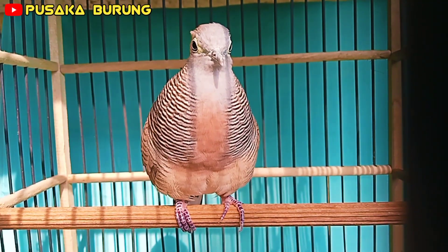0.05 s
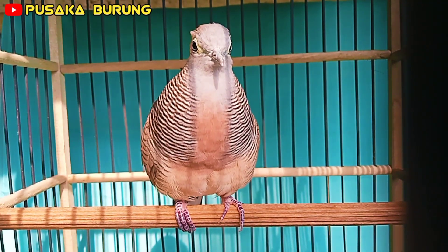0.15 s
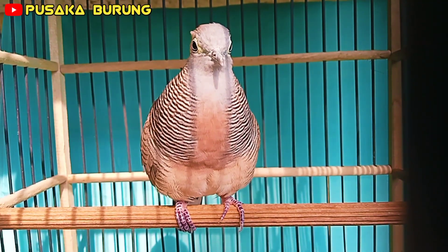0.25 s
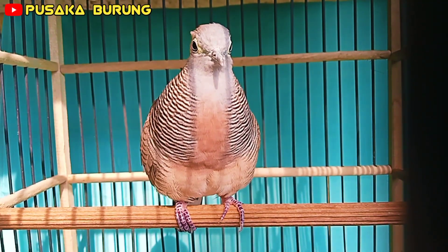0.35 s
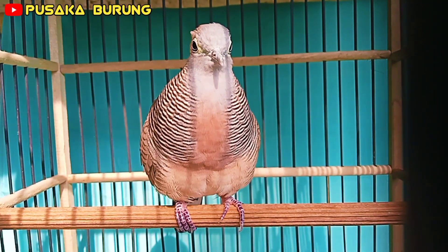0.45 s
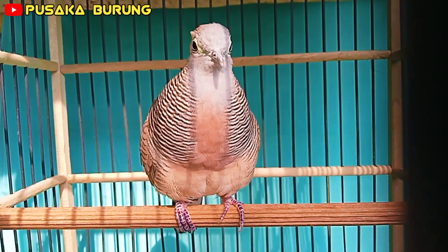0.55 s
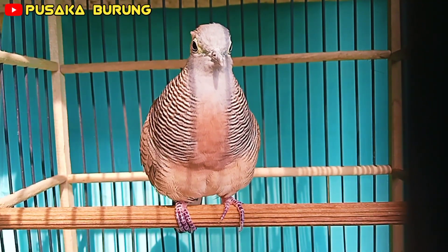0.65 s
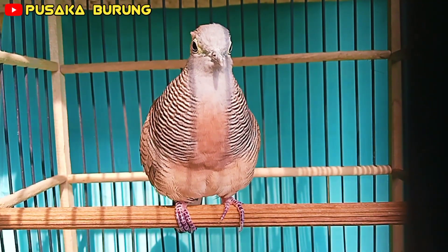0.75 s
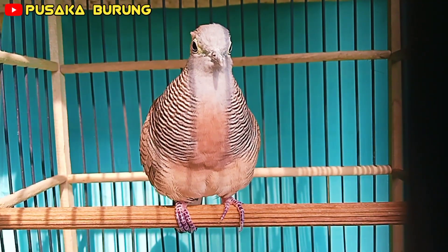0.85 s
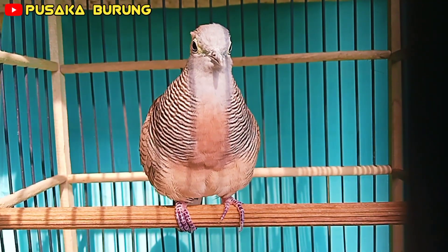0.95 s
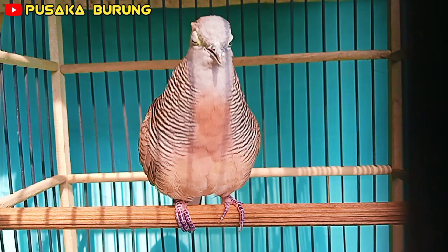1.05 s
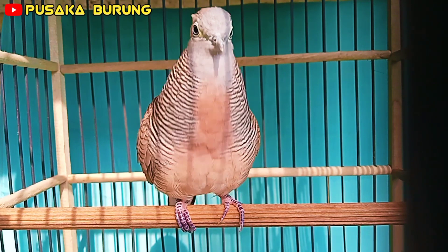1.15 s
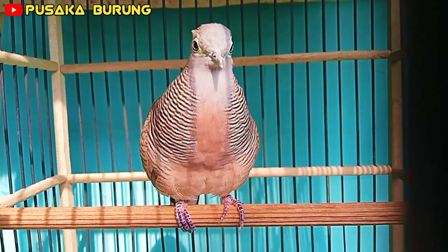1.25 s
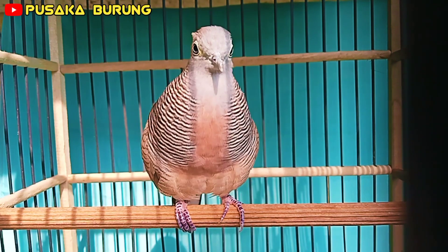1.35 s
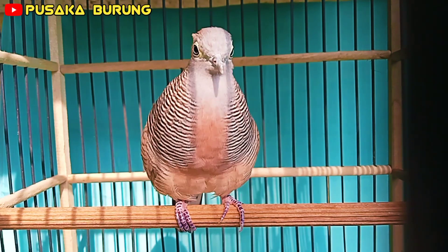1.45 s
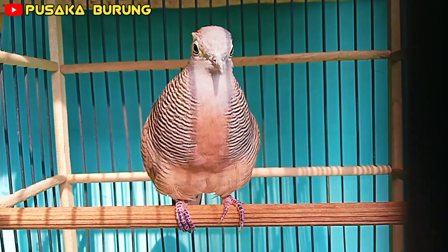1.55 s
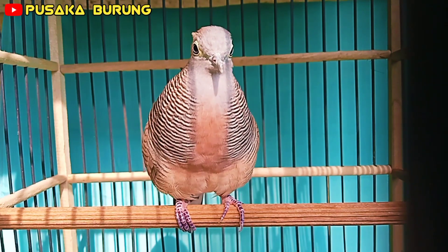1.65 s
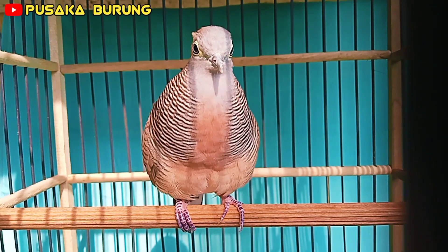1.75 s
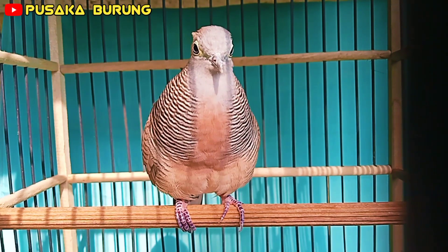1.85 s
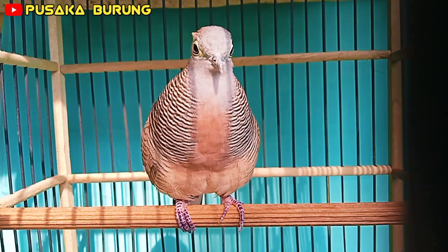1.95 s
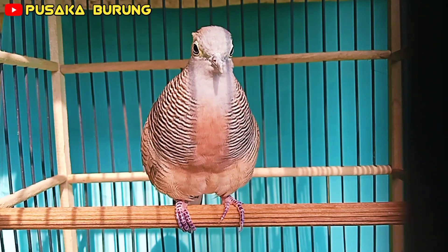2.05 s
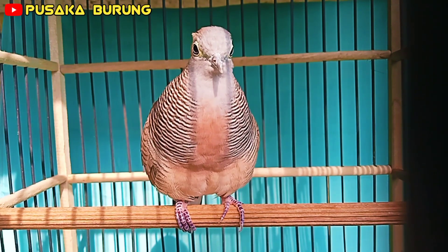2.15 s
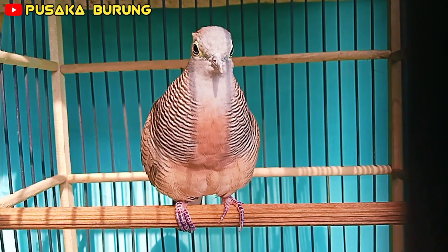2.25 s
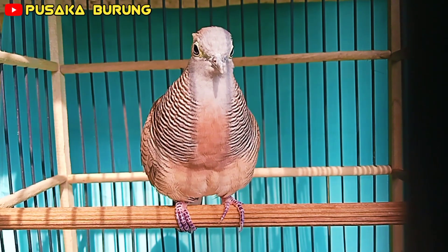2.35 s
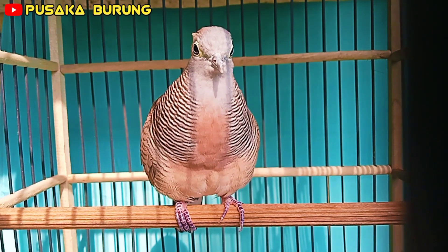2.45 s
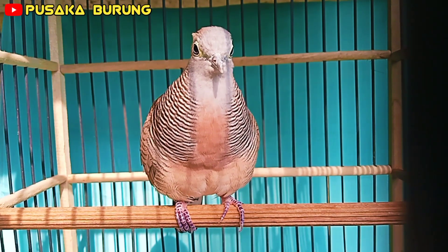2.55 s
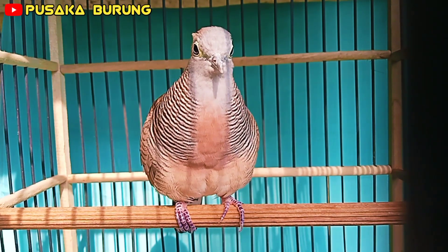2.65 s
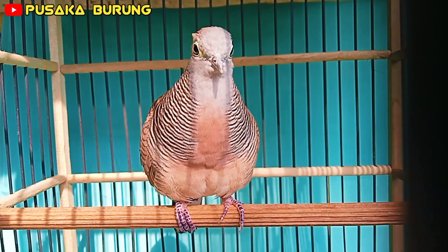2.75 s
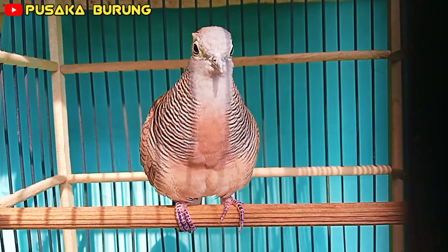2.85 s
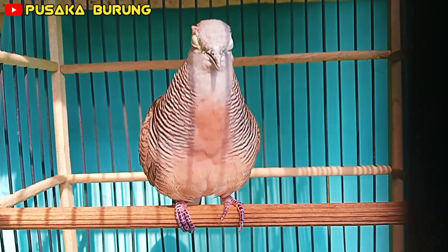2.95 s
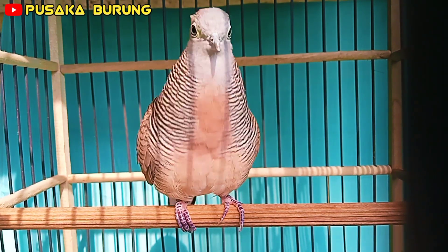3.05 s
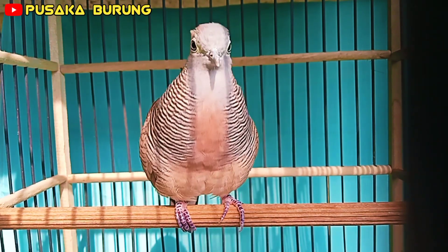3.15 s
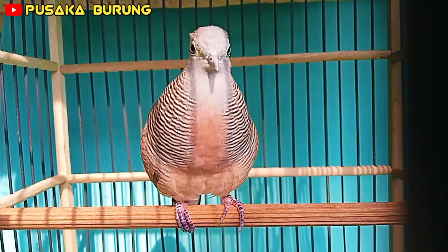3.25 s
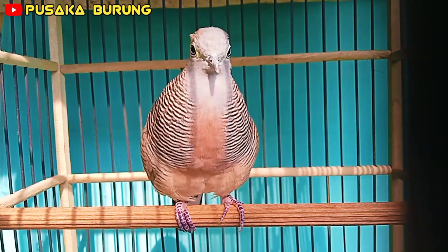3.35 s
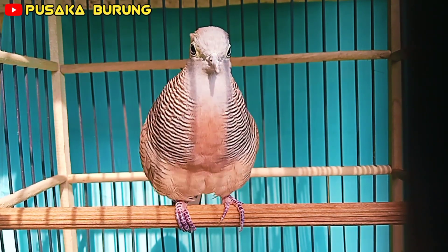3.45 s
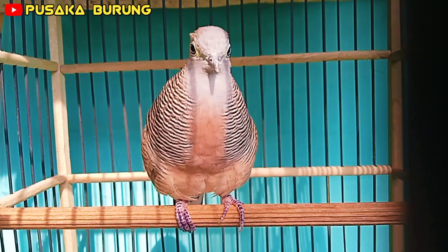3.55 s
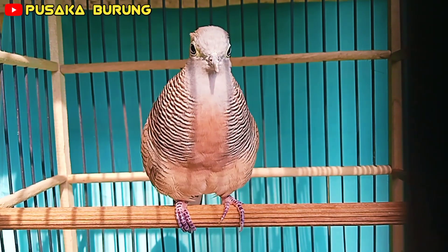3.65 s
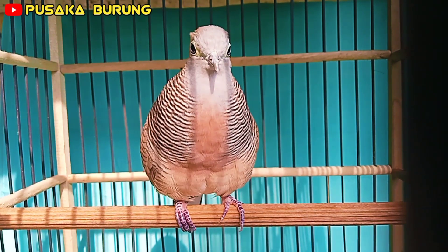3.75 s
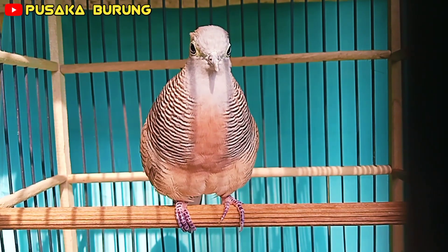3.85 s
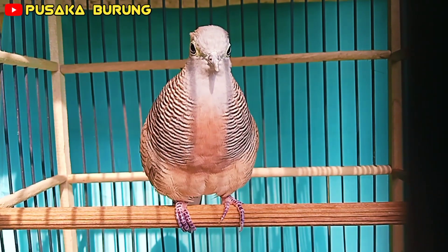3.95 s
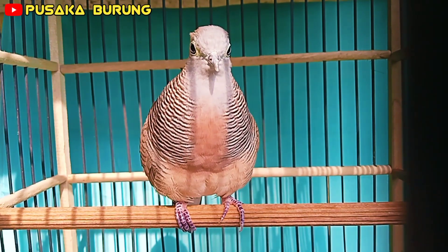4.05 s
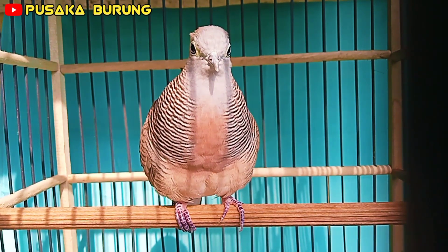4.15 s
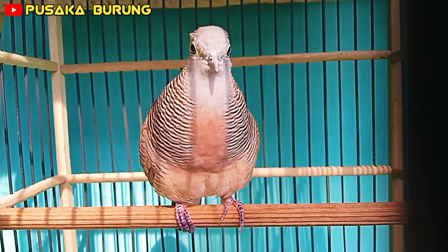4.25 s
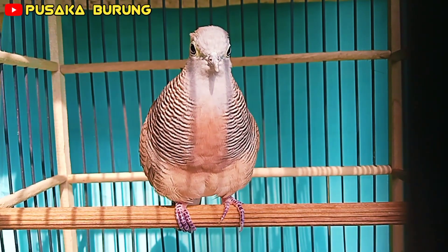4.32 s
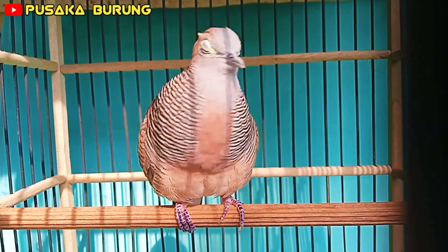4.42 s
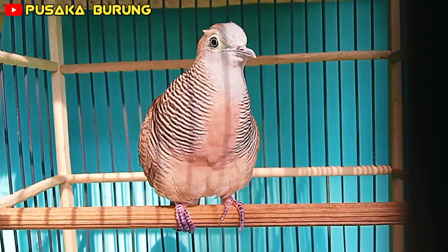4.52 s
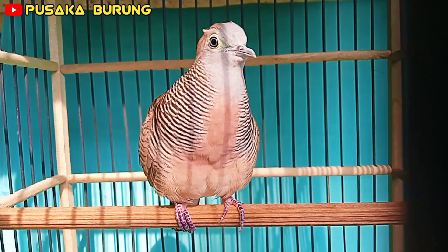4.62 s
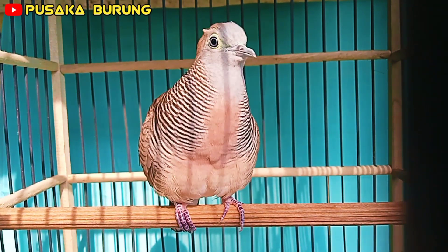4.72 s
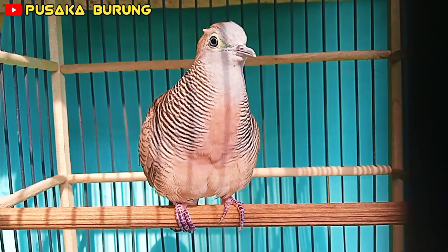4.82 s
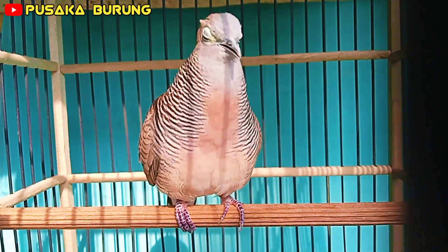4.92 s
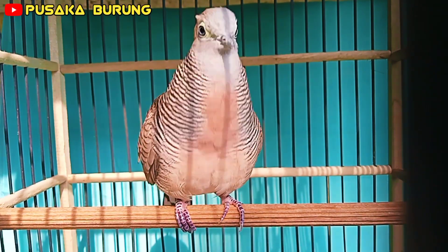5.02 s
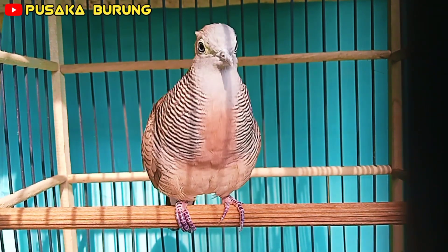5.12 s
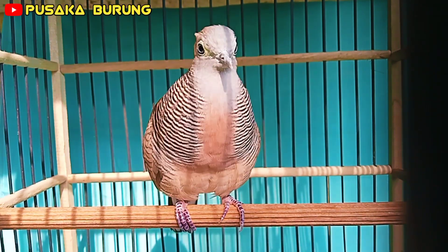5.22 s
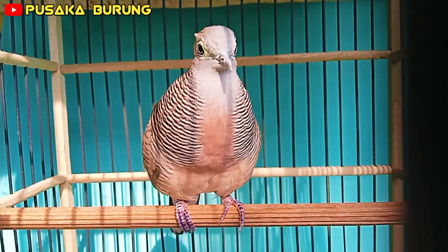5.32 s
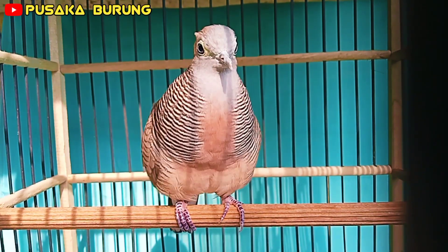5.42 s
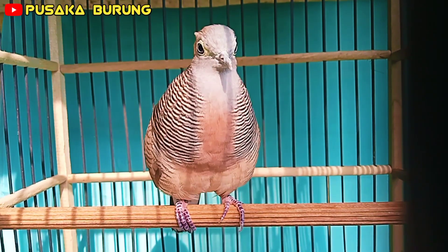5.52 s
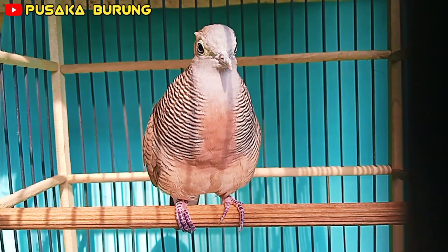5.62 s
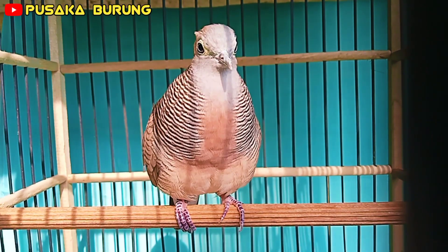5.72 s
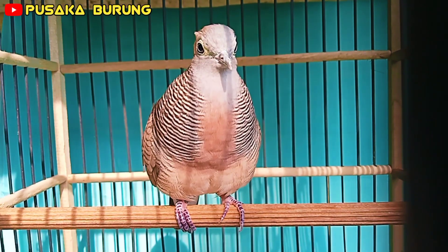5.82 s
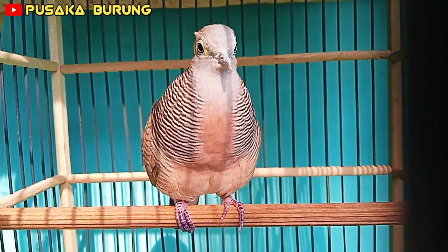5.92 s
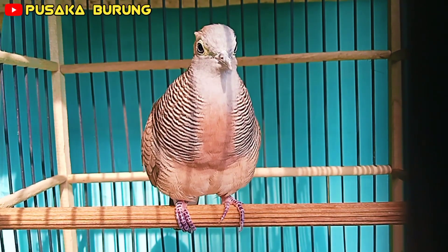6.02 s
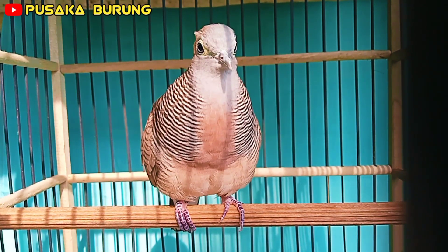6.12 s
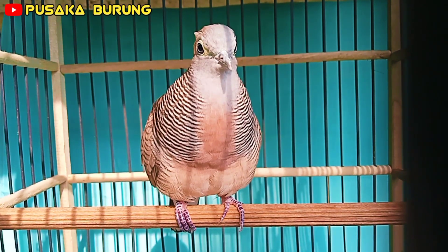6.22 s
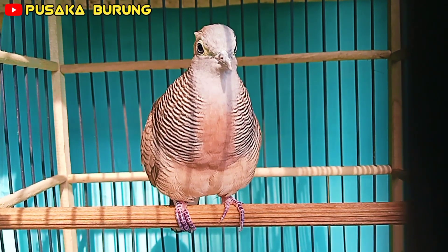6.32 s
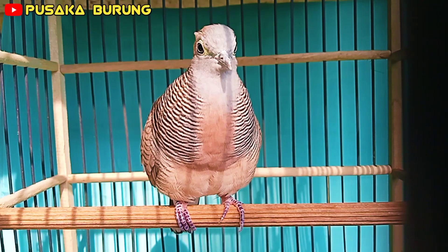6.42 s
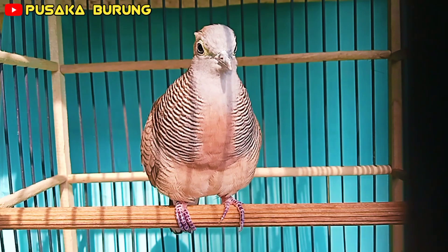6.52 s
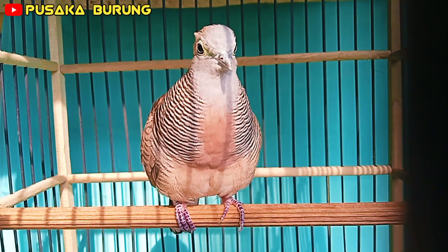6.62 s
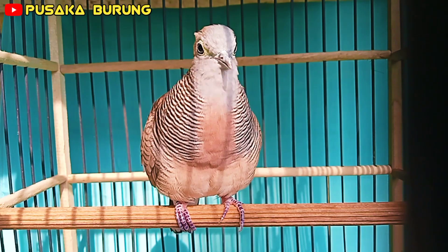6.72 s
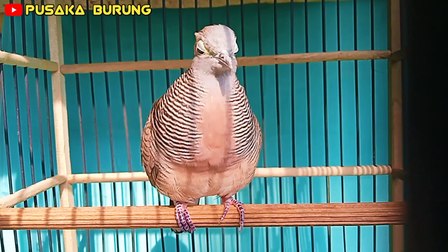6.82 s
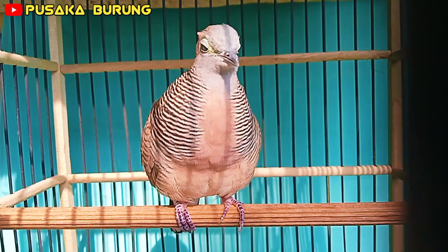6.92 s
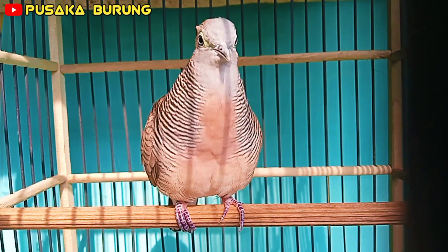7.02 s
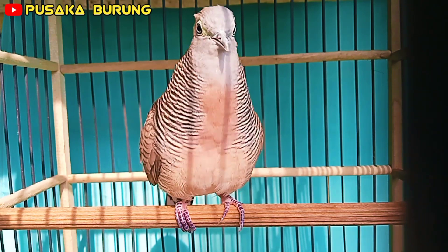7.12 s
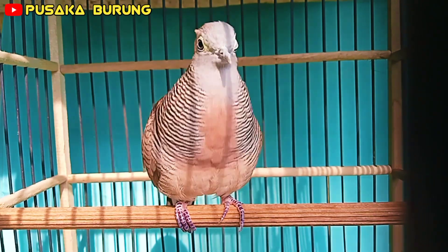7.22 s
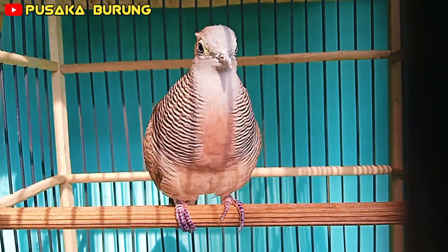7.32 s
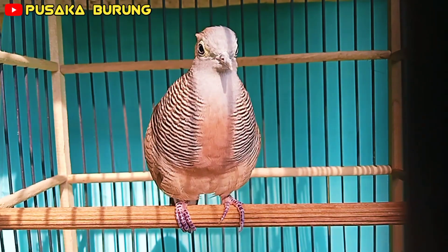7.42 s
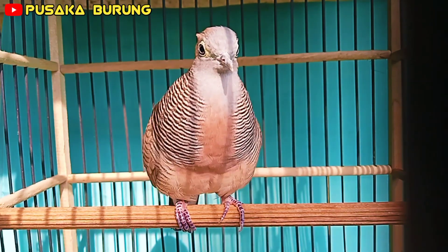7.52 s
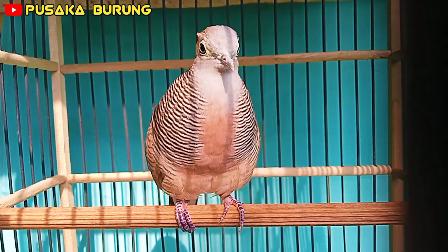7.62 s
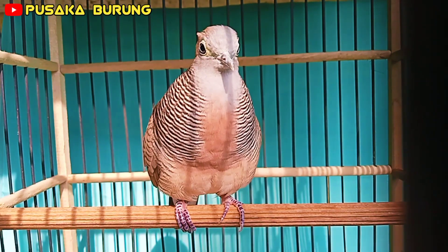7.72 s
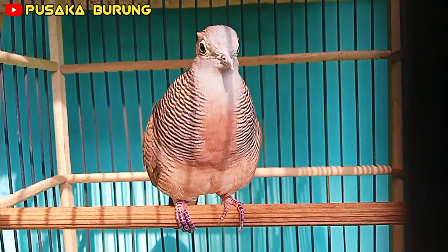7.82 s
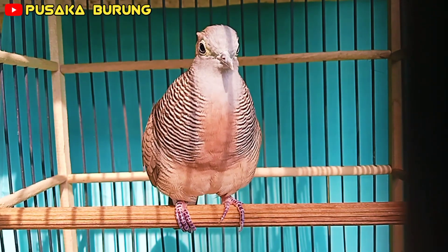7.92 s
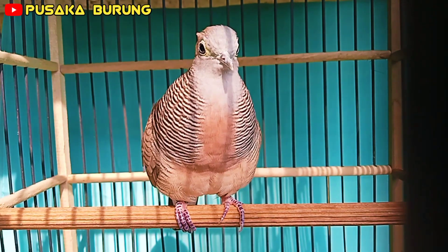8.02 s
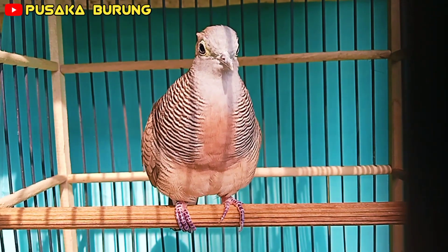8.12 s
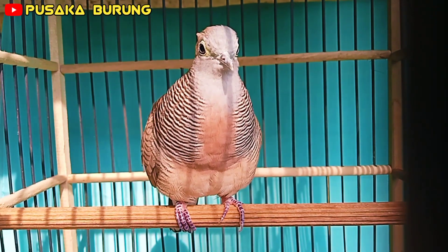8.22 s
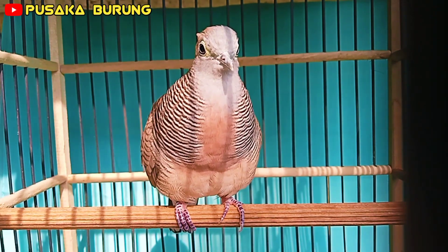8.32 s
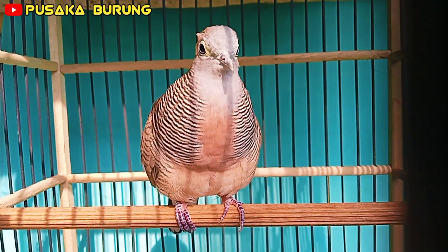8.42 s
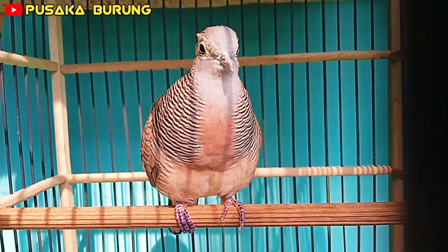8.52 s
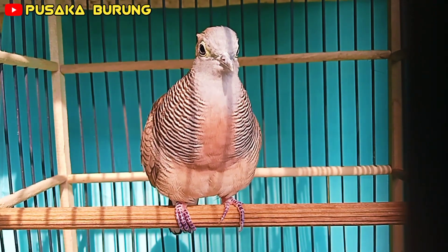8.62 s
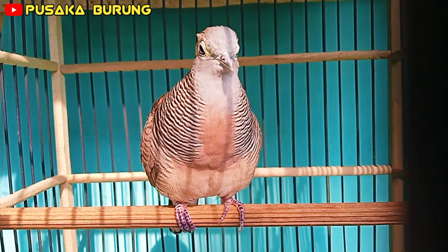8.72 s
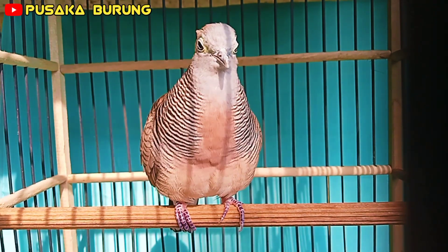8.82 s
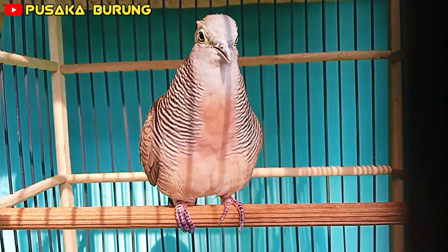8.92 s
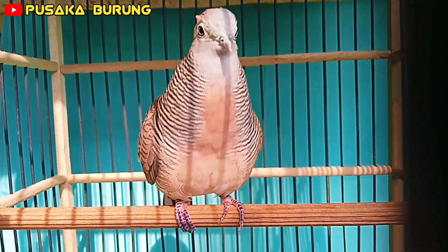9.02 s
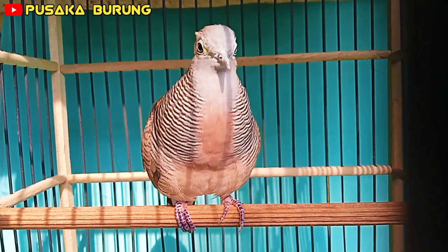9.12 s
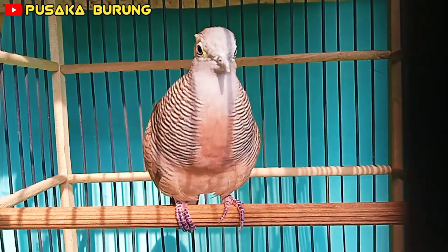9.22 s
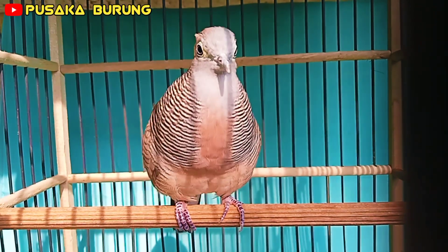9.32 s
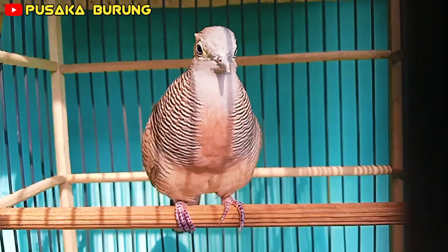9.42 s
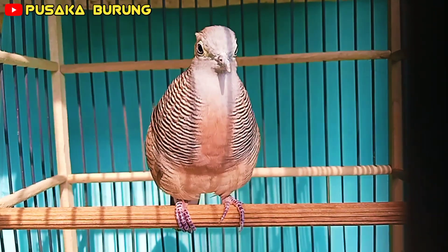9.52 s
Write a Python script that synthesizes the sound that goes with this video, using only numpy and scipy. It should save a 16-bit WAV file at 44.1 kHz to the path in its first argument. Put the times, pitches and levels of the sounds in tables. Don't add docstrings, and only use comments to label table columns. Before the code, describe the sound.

A caged dove close by repeats a quick rolling coo ending in three clipped notes, over another dove's cooing, cicada hiss and distant birds.

```python
import sys
import numpy as np
from scipy import signal
from scipy.fft import rfft, irfft, next_fast_len
from scipy.io import wavfile
from scipy.ndimage import uniform_filter1d, map_coordinates

SR = 44100
rng = np.random.default_rng(int(sys.argv[2]) if len(sys.argv) > 2 else 0)


def voltage_ratio(decibels):
    exponent = np.asarray(decibels, float) / 20
    return 10 ** exponent


def file_out(sig):
    cols = np.atleast_2d(sig).T
    lim = np.clip(cols, -1, 1)
    pcm = np.round(lim * 32767).astype(np.int16)
    wavfile.write(sys.argv[1], SR, pcm)


N = 421596
T = np.arange(N) / SR


def unit(x):
    return x / np.sqrt(np.mean(x ** 2) + 1e-20)


def along(points, hz):
    f, v = np.transpose(points)
    return np.interp(np.log(hz + 1), np.log(f + 1), v)


def wobble(rate):
    return map_coordinates(rng.standard_normal(int(N * rate / SR) + 4), [T * rate])


def swells(rows):
    return sum(db * np.exp(-((T - s) / width) ** 2) for s, width, db in rows)


def filtered(x, response):
    m = next_fast_len(len(x) + 8192)
    return irfft(rfft(x, m) * response(np.fft.rfftfreq(m, 1 / SR)), m)[:len(x)]


def resonant(modes):
    return lambda f: sum(voltage_ratio(db) * 1j * f * w / (c * c - f * f + 1j * f * w) for c, w, db in modes)


def above(edge_hz):
    return lambda f: (-f * f / (edge_hz ** 2 - f * f + 1.4j * f * edge_hz)) ** 2


def add(track, s, x):
    part = track[round(s * SR):][:len(x)]
    part += x[:len(part)]


def tone(hz, overtones):
    turn = 2 * np.pi * np.cumsum(hz) / SR
    return sum(voltage_ratio(db) * np.sqrt(2) * np.sin(k * turn) for k, db in overtones)


def hiss(spectrum, patchy_db, size):
    z = signal.stft(rng.standard_normal(N), nperseg=1024)[2]
    field = uniform_filter1d(rng.standard_normal(z.shape), size=size[0], axis=0)
    field = uniform_filter1d(field, size=size[1], axis=1)
    x = signal.istft(z * voltage_ratio(patchy_db * unit(field)), nperseg=1024)[1][:N]
    return unit(filtered(x, lambda hz: voltage_ratio(along(spectrum, hz))))


def glides(rows, bend, overtones, unsteady_db, waver):
    x, quiver = np.zeros(N), 1 + waver * wobble(70)
    for s, length, start_hz, end_hz, db in rows:
        u = np.arange(0, 1, 1 / (length * SR))
        hz = (start_hz + (end_hz - start_hz) * u ** bend) * quiver[round(s * SR):][:len(u)]
        add(x, s, voltage_ratio(db) * np.sin(np.pi * u) ** 0.11 * tone(hz, overtones))
    return x * voltage_ratio(unsteady_db * wobble(60))


# frequency in Hz, time to die by 60 dB in seconds.
PORCH_DECAY = [(300, 0.28), (1200, 0.18), (5000, 0.13)]


def porch(x, gap):
    hz, t, z = signal.stft(rng.standard_normal(SR // 3), SR, nperseg=256)
    tail = signal.istft(z * voltage_ratio(-60 * t / along(PORCH_DECAY, hz)[:, None]), SR, nperseg=256)[1]
    return signal.fftconvolve(np.pad(x, (round(gap * SR), 0)), tail / np.linalg.norm(tail))[:N]


# delay in seconds, level in dB.
WALL_ECHOES = [(.009, -25.5), (.016, -23.5), (.024, -33), (0.032, -31.5), (0.042, -32.5), (.05, -32.5),
               (0.06, -40.5)]


def walls(x):
    echo = np.zeros(N)
    for s, db in WALL_ECHOES:
        add(echo, s, voltage_ratio(db) * x)
    return echo


# frequency in Hz, level in dB per Hz.
YARD_COLOUR = [(15, -57.5), (25, -30), (82, -1.5), (288, -15), (437, -14.5), (469, -15), (730, -17),
               (942, -27), (1110, -16.5), (1370, -30.5), (3390, -25), (4380, -27), (6500, -41), (8450, -58),
               (14300, -120)]
# frequency in Hz, level in dB per Hz.
RUSTLE_COLOUR = [(300, -43.5), (700, 3), (2500, -5.5), (6000, -4), (11000, -11.5), (15500, -15.5)]
# centre in seconds, width in seconds, level in dB.
STIRS = [
    (.3, .35, 5),
    (.92, .2, 9),
    (1.55, .1, 8),
    (2.45, .2, 8),
    (3.7, .4, 8.5),
    (5.0, .25, 8),
    (6.9, .5, 8.5),
]


def yard():
    rumble_db, rustle_db = -55.5, -65
    grains = voltage_ratio(4.1 * wobble(120))
    rustle = unit(grains * hiss(RUSTLE_COLOUR, patchy_db=4.5, size=(6, 8)))
    rumble = voltage_ratio(rumble_db + 1.5 * wobble(2.983)) * hiss(YARD_COLOUR, patchy_db=3.0, size=(3, 8))
    return rumble + voltage_ratio(rustle_db + swells(STIRS)) * rustle


# frequency in Hz, level in dB per Hz.
CICADA_COLOUR = [(3650, -57), (6200, -30), (6640, -16.5), (6820, -9.5), (7480, -10.5), (8790, -0.5),
                 (9270, 2), (9710, -3), (10500, -14), (11200, -16), (12200, -33), (13800, -26.5),
                 (15500, -37)]
# pitch in Hz, level in dB.
SINGERS = [(7084, -70), (7800, -65), (8123, -68), (8430, -65.5), (8678, -61.5), (8775, -61), (9060, -68.5),
           (9372, -61.5), (9717, -66.5), (10078, -75)]


def cicadas():
    chorus_db = -45.5
    x = voltage_ratio(chorus_db + .35 * wobble(1.1) + .4 * wobble(8)) * hiss(CICADA_COLOUR, patchy_db=3.2, size=(2, 40))
    for hz, db in SINGERS:
        x = x + voltage_ratio(db - 3.0 + 1.2 * wobble(2.7) + 4.9 * wobble(40)) * tone(hz + 30 * wobble(60), [(1, 0)])
    return x


# centre in seconds, width in seconds, level in dB.
CRICKET_SWELLS = [
    (2.35, .3, 3),
    (2.95, .25, -4),
    (3.95, .25, 5),
    (6.2, .2, 3),
    (8.3, .35, -4),
]


def cricket():
    bursts = np.clip(.55 + .3 * wobble(4) + .45 * wobble(18), 0, 1.5)
    high = voltage_ratio(-69) * bursts * tone(13990 + 20 * wobble(40), [(1, 0)])
    joins_s, ring_hz, ring_db = 2.1, 3475, -69.5
    db = swells(CRICKET_SWELLS) + ring_db - 7 * (T < joins_s) + 1.5 * wobble(1.5) + 3.5 * wobble(40)
    return high + voltage_ratio(db) * tone(ring_hz + 20 * wobble(50), [(1, 0)])


# start in seconds, length in seconds, start pitch in Hz, end pitch in Hz, level in dB.
SLURS = [(1.16, 0.053, 3500, 3080, -57), (1.78, 0.057, 4320, 3700, -62.5), (2.14, .15, 5110, 4600, -61),
         (2.3, .05, 5250, 4870, -59), (2.44, .085, 5580, 4500, -59), (2.69, .19, 5050, 4900, -59),
         (2.58, .095, 4650, 3200, -59), (2.677, 0.026, 2700, 2050, -54), (3.0, 0.043, 3580, 3200, -58),
         (3.76, 0.063, 3340, 2883, -53.5), (4.44, .14, 4300, 3300, -58.5), (4.73, 0.065, 4150, 3100, -54.5),
         (3.69, .045, 5200, 4600, -56), (3.8, .045, 5200, 5050, -60), (4.24, .09, 3350, 2600, -61),
         (5.0, 0.096, 4250, 3050, -52.5), (6.25, 0.053, 4500, 4130, -63), (7.49, 0.044, 3490, 2780, -61),
         (7.84, 0.12, 5110, 4560, -54.5), (7.85, .17, 5500, 4780, -61), (7.96, 0.085, 3490, 2870, -54.5),
         (8.13, 0.11, 4650, 4260, -54.5), (8.2, 0.14, 4130, 2700, -53.5), (8.15, .1, 5300, 4900, -64),
         (8.29, 0.054, 5100, 4400, -61), (.48, 0.11, 4970, 4200, -64), (8.875, .125, 5230, 4720, -53.5),
         (9.0, .05, 4700, 3950, -49.5), (8.9, 0.079, 4000, 3500, -59), (9.1, .04, 4020, 3900, -59),
         (6.53, .075, 4200, 3350, -55), (6.2, .045, 5150, 5000, -63), (6.8, .1, 3100, 2400, -63),
         (8.61, .09, 5050, 3950, -63), (2.08, .03, 3050, 2850, -58), (2.0, .03, 4950, 4600, -62),
         (6.38, .09, 4500, 3700, -62), (9.5, .05, 4250, 4000, -56), (8.25, .1, 3400, 2450, -60),
         (7.95, .2, 4000, 2450, -56.5)]
HOOKS = [
    (1.9, .21, 4720, 2840, -63),
    (5.8, 0.13, 5200, 5020, -60.5),
    (6.58, .12, 4874, 3900, -63),
    (7.4, 0.1, 5100, 3900, -47.5),
    (7.97, .09, 4650, 4150, -52),
]
LATE_HOOKS = [
    (5.94, .22, 4960, 4340, -59),
    (6.295, .155, 5220, 2900, -54.5),
]
# start in seconds, pitch in Hz, level in dB.
PIPS = [
    (3.17, 5080, -60),
    (4.69, 4270, -59.5),
    (6.49, 4260, -55),
    (8.82, 5100, -63),
    (4.965, 4260, -57),
    (4.975, 3700, -55.5),
    (5.11, 3700, -54),
    (6.49, 4760, -60),
]
# start in seconds, start pitch in Hz, level in dB.
CHIPS = [
    (9.03, 5200, -60),
    (9.07, 5200, -58),
    (9.115, 5350, -56),
    (9.158, 5350, -55),
]


def whistles():
    pip_s, pip_fall, chip_s, chip_fall = .04, .98, .021, .82
    pips = [(s, pip_s, hz, hz * pip_fall, db) for s, hz, db in PIPS]
    chips = [(s, chip_s, hz, hz * chip_fall, db) for s, hz, db in CHIPS]
    kinds = [(SLURS + pips + chips, 1.1), (HOOKS, 3), (LATE_HOOKS, 5)]
    return sum(glides(rows, bend, [(1, 0)], unsteady_db=3.5, waver=.005) for rows, bend in kinds)


# start in seconds, length in seconds, start pitch in Hz, end pitch in Hz, level in dB.
HOOTS = [
    (5.28, 0.038, 375, 453, -49),
    (5.72, .095, 294, 338.7, -45.5),
    (6.02, 0.046, 360, 365, -48.5),
    (6.09, .045, 375, 395, -48),
    (6.11, .07, 590, 650, -58),
    (4.16, 0.063, 760, 740, -61.5),
    (2.83, .05, 1090, 990, -64),
    (2.84, .04, 1450, 1450, -65.5),
    (6.46, .088, 381, 369, -45),
    (8.22, .04, 536, 532, -52),
]


def pigeon():
    return glides(HOOTS, .9, [(1, 0), (2, -16)], unsteady_db=1.5, waver=.006)


# time in seconds, pitch in Hz, level in dB.
CROW = [(7.99, 672.1, -61.5), (8.01, 691, -53.5), (8.032, 628, -54), (8.272, 681, -53), (8.319, 663, -56),
        (8.35, 624, -58.5), (8.5, 600, -58), (8.54, 597, -54)]
# multiple of the pitch, level in dB.
CROW_OVERTONES = [(2, -1.5), (3, -3.5), (4, -17.5), (5, -16)]


def cock():
    s, hz, db = np.transpose(CROW)
    pitch = np.interp(T, s, hz) * (1 + 0.022 * wobble(140))
    return voltage_ratio(np.interp(T, s, db, -120, -120) + 3.9 * wobble(60)) * tone(pitch, CROW_OVERTONES)


# start in seconds, peak level in dB.
GECKO_TICKS = [
    (2.0224, -41.5),
    (2.138, -39),
    (2.2588, -37.5),
    (2.382, -37),
    (2.5009, -38),
    (2.6243, -40),
]
# resonance in Hz, width in Hz, level in dB.
GECKO_MOUTH = [(1150, 250, 0), (1540, 270, 1), (1810, 300, -1), (3700, 1100, -7)]


def gecko():
    x = np.zeros(N)
    for s, db in GECKO_TICKS:
        tick = uniform_filter1d(rng.standard_normal(400), size=6)
        add(x, s, voltage_ratio(db + 10.5 - 60 * T[:400] / 0.02) * tick)
    mouth = resonant(GECKO_MOUTH)
    return filtered(x, lambda f: mouth(f) * np.abs(mouth(f)))


# start in seconds, level in dB, time to die by 60 dB in seconds,
# lowest frequency in Hz, highest frequency in Hz.
KNOCKS = [(6.741, -32, 0.46, 510, 1660), (6.744, -36, 0.26, 2800, 12000), (7.0045, -22, 0.42, 58, 30000),
          (7.459, -29.5, 0.26, 280, 1040), (2.925, -46.5, 0.22, 440, 4800), (2.33, -53.5, 0.64, 300, 12000),
          (0.81, -55, 1.5, 1600, 12000), (0.3, -51.5, 0.26, 690, 5000), (.29, -45, 0.44, 690, 1100),
          (.48, -48.5, 0.35, 280, 2800), (.58, -41.5, 0.23, 280, 2640), (.63, -59, 0.36, 1500, 4800),
          (1.145, -47.5, 0.2, 1400, 5000), (3.03, -48, .1, 2400, 5800), (2.05, -51.5, 0.5, 130, 830),
          (4.3, -52, .2, 800, 1400), (4.385, -56, .15, 1400, 1900), (5.98, -48, 0.32, 350, 1100),
          (8.98, -47.5, .25, 445, 800), (.02, -51.5, 0.25, 330, 800), (6.1, -46, 0.11, 200, 400),
          (4.0, -54, 0.25, 650, 1100), (5.4, -49, 0.25, 950, 1900), (7.595, -37.5, 0.19, 200, 760),
          (7.0045, -26.5, 0.038, 204, 570)]
# frequency in Hz, level in dB per Hz.
KNOCK_COLOUR = [(71, -32), (120, -18), (609, -6.5), (747, -8.5), (843, -8.5), (1170, -8), (1860, -6),
                (2680, -7.5), (3570, -1.5), (9080, -3.5), (15400, -22)]


def knocks():
    x, t = np.zeros(N), T[:SR // 2]
    for s, db, t60, thin_hz, dull_hz in KNOCKS:
        colour = lambda f: voltage_ratio(along(KNOCK_COLOUR, f)) / (1 + (f / dull_hz) ** 4) / (1 + (thin_hz / (f + 1)) ** 4)
        burst = unit(filtered(rng.standard_normal(len(t)), colour))
        onset = 1 - np.exp(-t / (.0006 if db > -35 else .006))
        add(x, s, voltage_ratio(db - 60 * t / t60) * (1 + voltage_ratio(-60 * t / 0.027)) * onset * burst)
    return x


# frequency in Hz, level in dB, time to die by 60 dB in seconds.
LID_MODES = [(686, 1.5, 0.16), (767, 7, 0.19), (864, 3.5, 0.25), (1555, 4, 0.19), (1633, 0, 0.22),
             (2560, -1.5, 0.12), (2840, -8, 0.2), (3900, 1.5, 0.089), (4286, 7, 0.3), (4300, -8, 0.2),
             (5200, -7, 0.23), (5480, -6, 0.26), (6756, -14, .12), (6970, 5.5, 0.12), (8880, -0.5, 0.17),
             (9880, -4.5, 0.13), (10900, -9.5, .12), (11550, -17.5, 0.12), (12400, -27, 0.11)]


def lid():
    x, t = np.zeros(N), T[:SR // 2]
    shake = 1.1 * wobble(150)[:len(t)]
    onset = 1 - np.exp(-t / 0.00086)
    for s, db in [(6.74, -42.5), (6.747, -32), (6.763, -36.5), (6.795, -44.5)]:
        for hz, level, t60 in LID_MODES:
            ring = onset * np.sin(2 * np.pi * hz * t + shake)
            add(x, s, voltage_ratio(db + level + rng.normal(0, 3.1) - 60 * t / t60) * ring)
    return x


def syrinx(hz, db, overtones, steady_hz, rasp_db, tense_hz, loose_db):
    slack = np.clip(1 - hz / steady_hz, 0, 1)
    noise = rng.standard_normal((2, len(hz)))
    flutter = 1 + 3 * slack * uniform_filter1d(noise[0], size=60)
    slope = np.gradient(hz) * SR / tense_hz
    slide = uniform_filter1d(np.abs(slope) - 0.5 * slope, size=300)
    thinning_db = 6 * np.log2(np.minimum(hz / tense_hz, 1)) - loose_db * slide
    rich = [(k, level + (k - 1) * thinning_db) for k, level in overtones]
    breath = unit(uniform_filter1d(uniform_filter1d(noise[1], size=17), size=12))
    return voltage_ratio(db) * (tone(hz * flutter, rich) + voltage_ratio(rasp_db) * slack * breath)


# start in seconds, length in seconds, top pitch in Hz, end pitch in Hz, level in dB.
PHRASE = [(4.522, .15, 1220, 1238, -17.5), (4.751, 0.037, 1215, 1170, -19), (4.854, 0.041, 1231, 1190, -18),
          (4.975, 0.084, 1280, 1140, -18), (5.155, 0.15, 1252, 1215, -20.5),
          (5.371, .14, 1257, 1192, -19.5), (5.617, .16, 1240, 1115, -18), (5.88, .178, 1235, 1125, -18),
          (6.156, 0.18, 1230, 1130, -18), (6.437, .168, 1235, 1130, -19), (6.707, 0.17, 1228, 1150, -18.5)]
# top pitch in Hz, level in dB.
AGAIN = [
    (1220, -17.5),
    (1215, -19),
    (1231, -18),
    (1275, -18),
    (1240, -20.5),
    (1257, -19),
]
EARLIER = [
    (0.019, .162, 1216, 1150, -25),
    (0.286, .172, 1198, 1150, -27),
    (0.568, 0.172, 1215, 1150, -26.5),
    (0.849, 0.172, 1207, 1150, -25),
]
# resonance in Hz, width in Hz, level in dB.
OTHER_THROAT = [(1257, 280, 1), (1607, 305, -9.5), (2130, 140, -13), (3650, 300, -15)]
# multiple of the pitch, level in dB.
OTHER_OVERTONES = [(1, 4), (2, -13), (3, -28)]


def other_dove():
    x = np.zeros(N)
    again_s, scoop_hz, sag_hz_per_s, release_share = 4.0591, 680.2, 89, 0.18
    again = [(r[0] + again_s, r[1], hz, r[3], db) for r, (hz, db) in zip(PHRASE, AGAIN)]
    for s, length, top_hz, end_hz, db in PHRASE + EARLIER + again:
        rise_s = .044 if end_hz > top_hz else .0115
        t = np.arange(.006 - 1.25 * rise_s, length, 1 / SR)
        left = (length - t) / length
        hz = top_hz - scoop_hz * np.exp(-t / rise_s * (t > 0))
        hz = hz - (top_hz - end_hz) * np.exp(-left / 0.095) - sag_hz_per_s * (t - length / 2)
        release_db = 20 * np.log10(np.clip(left / release_share, 1e-3, 1))
        swell_db = -7 * np.exp(-t / (0.76 * rise_s)) + release_db
        note = syrinx(hz, db + swell_db, OTHER_OVERTONES, steady_hz=1001, rasp_db=7.5, tense_hz=300, loose_db=0)
        add(x, s + t[0], note)
    add(x, 0.0361, voltage_ratio(-17) * x[:round((PHRASE[0][0] - 1) * SR)])
    return filtered(x, lambda f: resonant(OTHER_THROAT)(f) ** 2 * above(edge_hz=1020)(f) ** 2)


def pulsing(t):
    beat_s, slowing_per_s = .033, .14
    t = np.maximum(t, 0)
    dip = np.cos(np.pi * t * (1 - slowing_per_s * t) / beat_s) ** 2
    late = t / .2
    sag_share = .33
    drop_hz = 225 * late ** 2.3 * (sag_share + (1 - sag_share) * dip ** 1.7)
    return drop_hz, 8 * late ** 4.5 * dip ** 5, dip * (2 + 2.5 * late ** 2)


# time after its first blip in seconds, pitch in Hz, effort in dB.
ROLL = [(-.031, 336.2, -45), (-.027, 380, -21), (-.014, 680, -22), (-.005, 950.5, -13), (.007, 1218, -11.5),
        (.02, 1262, -16.5), (.195, 1244, -11), (.204, 1227, -12), (.208, 1200, -54.5)]
CLIPPED = [(-.014, 420, -33.5), (-.01, 598, -26.5), (-.004, 969, -14.5), (.002, 1094, -9),
           (.014, 1127, -13), (.019, 1029, -13.5), (.024, 973, -17), (.027, 940, -55.5)]
LAST = [(-.017, 400, -35.5), (-.012, 596, -26), (-.004, 940, -16.5), (.003, 1106, -8.5),
        (.012, 1190, -13.5), (.032, 1187, -13), (.048, 1112, -12), (.059, 999, -17), (.063, 940, -54)]
# starts in seconds of the roll, first, second and last clipped note.
CALLS_AT = [
    (1.348, 1.5735, 1.635, 1.7195),
    (3.244, 3.4675, 3.531, 3.618),
    (5.197, 5.423, 5.4855, 5.5735),
    (7.3275, 7.547, 7.6115, 7.702),
    (9.218, 9.441, 9.504, 9.59),
]
LAST_HELD = [
    0.87,
    1.05,
    1.08,
    0.96,
    1,
]
FILL_CLICK_DB = [
    -40,
    -41,
    -37.5,
    -43,
    -46,
]
# resonance in Hz, width in Hz, level in dB.
NEAR_THROAT = [(974, 100, 5.5), (1190, 152, -6.5), (2490, 205, -13)]
# frequency in Hz, width in Hz, share swallowed.
NECK_DIPS = [(720, 320, .55), (4400, 500, .6)]
# multiple of the pitch, level in dB.
NEAR_OVERTONES = [(1, 2.5), (2, -11), (3, -12.5), (4, -13.5), (5, -4.5), (6, -22.5), (9, -16), (10, -17.5),
                  (12, -16)]


def near_dove():
    x = np.zeros(N)
    for (roll, first, second, last), held, click_db in zip(CALLS_AT, LAST_HELD, FILL_CLICK_DB):
        tempo = (first - roll) / .224
        # (start s, course, stretch, pitch ratio, gain dB)
        parts = [(roll, ROLL, tempo, 1, 0), (first, CLIPPED, 1, 1, 0),
                 (second, CLIPPED, .88, 0.99, 1.1), (last, LAST, held, 1, 0)]
        for s, part, stretch, ratio, gain_db in parts:
            at, hz, db = np.transpose(part)
            at = np.where(at > 0, at * stretch, at)
            t = np.arange(at[0], at[-1], 1 / SR)
            dip_hz, choke_db, dull_db = pulsing(t / tempo) if part is ROLL else (0, 0, 1.4)
            hz = uniform_filter1d(np.interp(t, at, hz * ratio), size=200) - dip_hz
            db = uniform_filter1d(np.interp(t, at, db + gain_db), size=200) - choke_db
            voice = [(k, level - (k - 1) * dull_db) for k, level in NEAR_OVERTONES]
            add(x, s + at[0], syrinx(hz, db, voice, steady_hz=940, rasp_db=7.0, tense_hz=1230, loose_db=0.5))
        add(x, roll - .064, voltage_ratio(click_db) * np.hanning(400) * np.sin(2 * np.pi * 990 * T[:400]))

    def neck(f):
        response = resonant(NEAR_THROAT)(f) * above(edge_hz=450)(f)
        for hz, width, share in NECK_DIPS:
            response = response * (1 - share * resonant([(hz, width, 0)])(f))
        return response
    return filtered(x, neck)


def scene():
    near, other, birds, hoots, crow = near_dove(), other_dove(), whistles(), pigeon(), cock()
    steady = cicadas() + cricket() + yard() + knocks() + lid()
    steady = filtered(steady, lambda hz: hz < 15600)
    echoes = walls(near + voltage_ratio(1.0) * other) + voltage_ratio(-31.5) * porch(near + other, gap=.03)
    echoes = echoes + voltage_ratio(-12) * porch(hoots, gap=0.014) + voltage_ratio(-7) * porch(birds, gap=0.0089)
    echoes = echoes + voltage_ratio(-3) * porch(crow, gap=.02)
    direct = near + other + voltage_ratio(-5.5) * birds + hoots + voltage_ratio(-2) * crow + gecko()
    return (direct + echoes + steady)[None]


def top_cut(x):
    return signal.sosfilt(signal.butter(12, 16500, fs=SR, output="sos"), x)


def record(dry):
    return top_cut(dry)


dry = scene()
out = record(dry)
file_out(out)
```